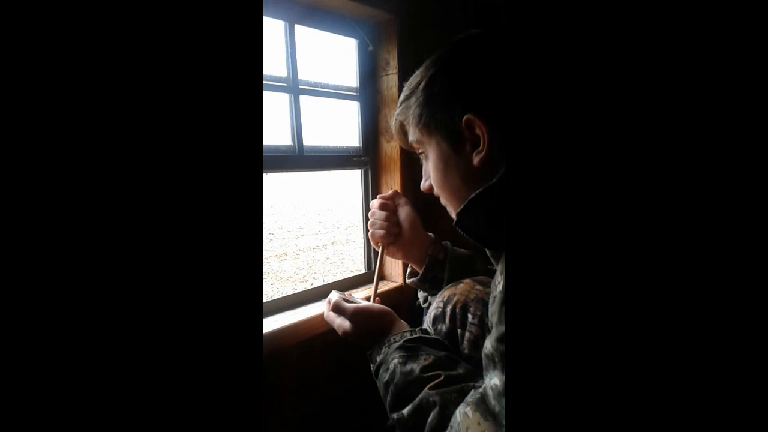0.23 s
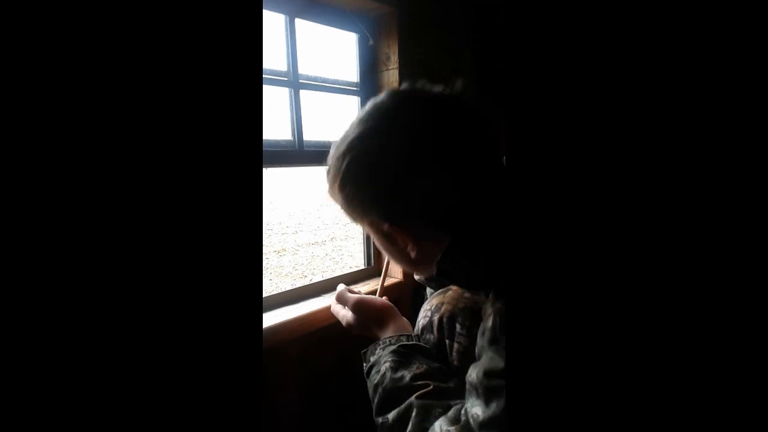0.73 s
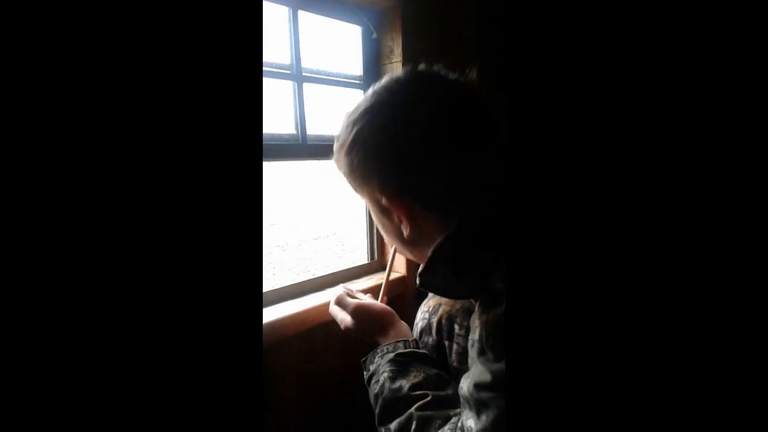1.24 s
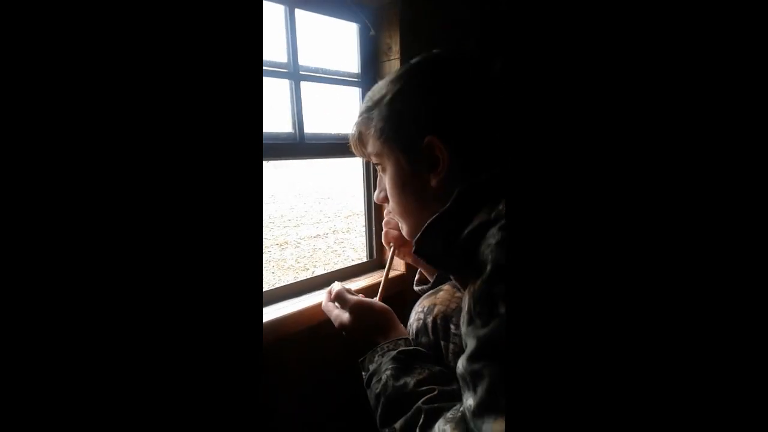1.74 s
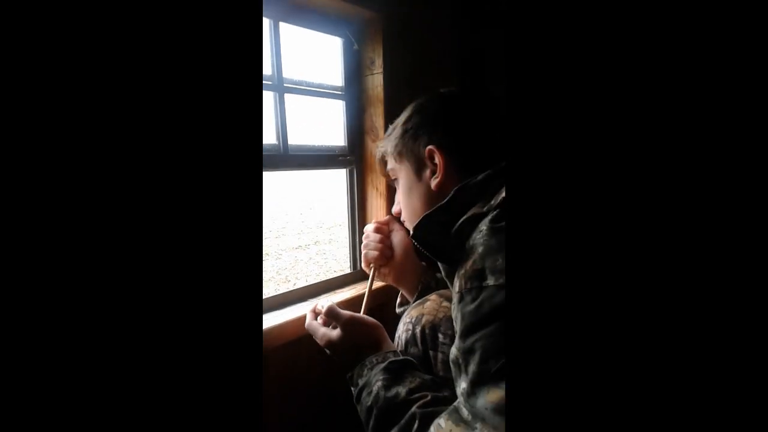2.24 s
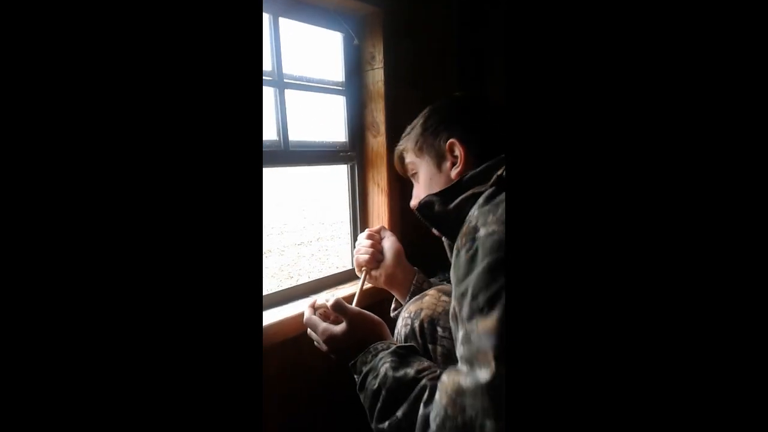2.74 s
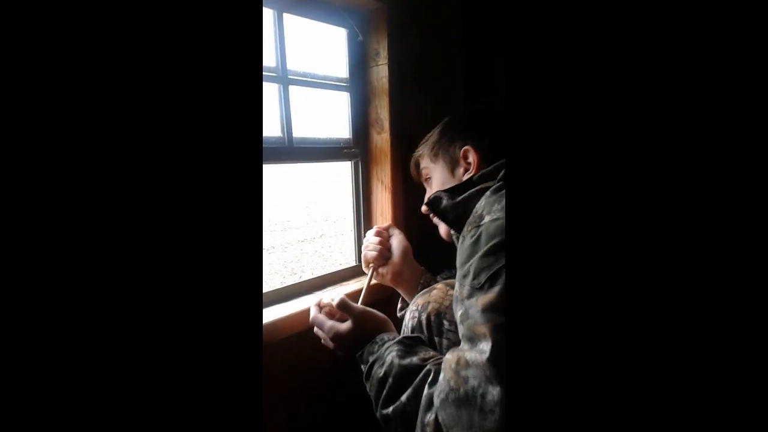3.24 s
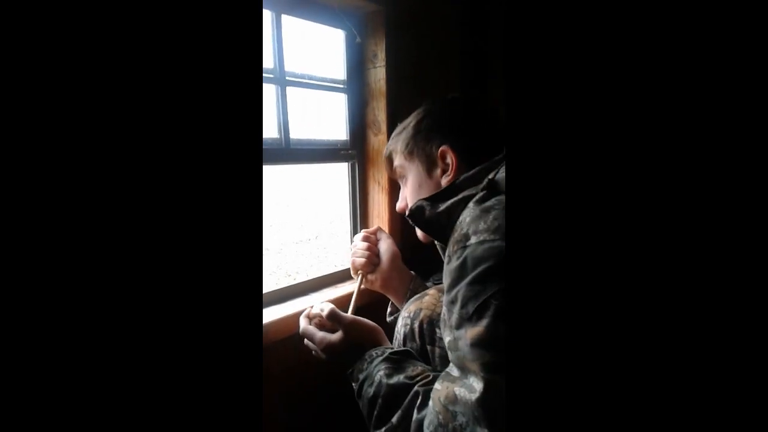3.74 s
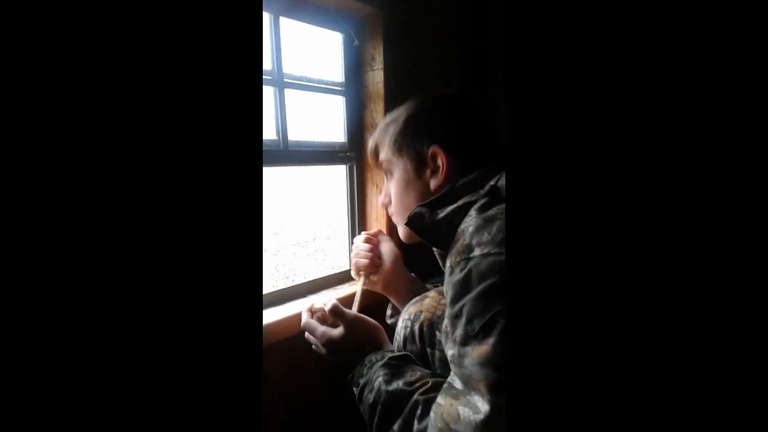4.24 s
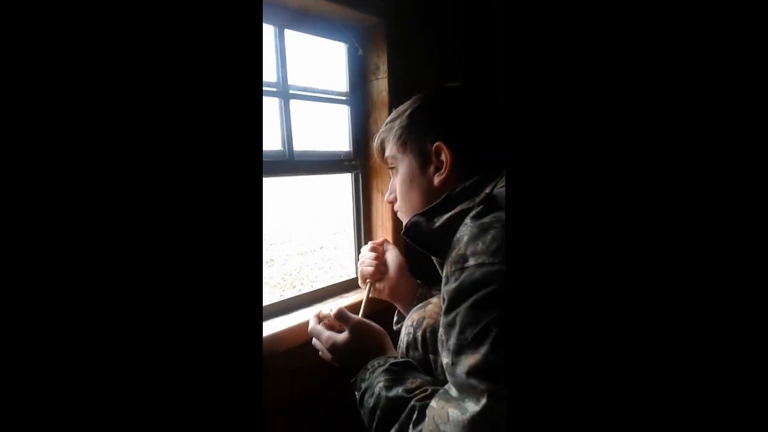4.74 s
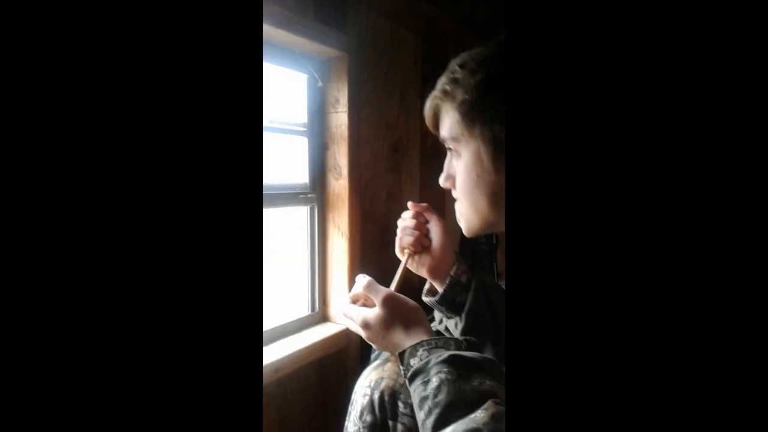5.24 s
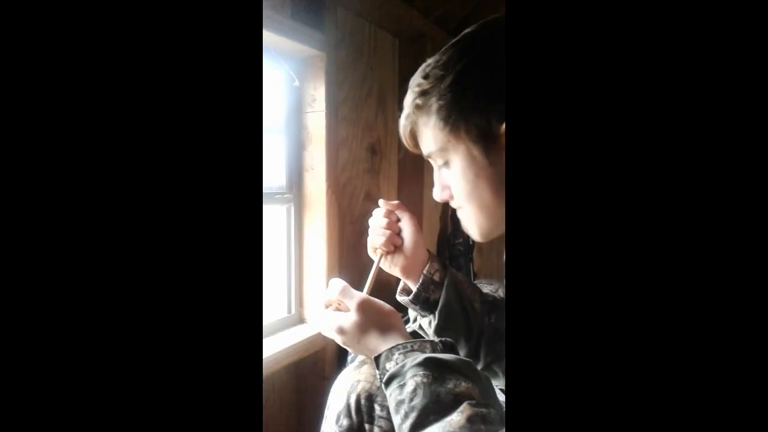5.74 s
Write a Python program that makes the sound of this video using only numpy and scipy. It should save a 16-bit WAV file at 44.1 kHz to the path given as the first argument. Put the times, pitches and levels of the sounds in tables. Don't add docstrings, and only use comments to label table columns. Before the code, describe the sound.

Close in a small wooden hunting blind, a wooden peg is scratched on a handheld friction pot call. Yelps start at once, a quick double bite at 0 s, then one every 0.2-0.3 s until the end near 5.8 s. Each lasts under a tenth of a second: a raspy, nasal, hen-turkey-like squawk with a buzzing pitch of a few hundred hertz, bending up or down, some clear, some split and gritty. The bare walls answer briefly. From 0.6 s the peg drags back lightly, most audibly around 0.7, 1.7 and 3.5 s. Sleeves brush at the start and near 2 and 2.8 s; muffled body shuffling swells around 0.9 s. A small tick comes at 1.46 s, the strongest yelps near 2.8 s, and a hard dull knock at 5.06 s, followed by two main yelps at 5.4 and 5.7 s. Faint hiss; phone microphone, left channel only, right silent.

```python
import sys
import numpy as np
from scipy import signal
from scipy.fft import rfft, irfft, next_fast_len
from scipy.io import wavfile
from scipy.ndimage import uniform_filter1d, minimum_filter1d, map_coordinates

SR = 44100
rng = np.random.default_rng(int(sys.argv[2]) if len(sys.argv) > 2 else 0)


def makeup_ratio(level_db):
    decades = np.asarray(level_db, float) / 20
    return 10 ** decades


def inscribe(sig):
    pcm = np.round(np.clip(np.atleast_2d(sig).T, -1, 1) * 32767)
    wavfile.write(sys.argv[1], SR, pcm.astype(np.int16))


N = 263717
SPAN = SR // 4
TAIL = SR // 2
LEAD = 512


def unit(x):
    return x / np.sqrt(np.mean(x ** 2) + 1e-20)


def along(points, hz):
    f, v = np.transpose(points)
    return np.interp(np.log(hz + 1), np.log(f + 1), v)


def filtered(x, response):
    m = next_fast_len(x.shape[-1] + 4096)
    spectrum = rfft(x, m) * response(np.fft.rfftfreq(m, 1 / SR))
    return irfft(spectrum, m)[..., :x.shape[-1]]


def wobble(rate_hz, n=N):
    knots = rng.standard_normal(n // 100)
    return map_coordinates(knots, [np.arange(n) * rate_hz / SR])


def swells(rows, floor_db):
    t = np.arange(N) / SR
    gain = makeup_ratio(floor_db)
    for middle_s, length_s, db in rows:
        phase = np.clip((t - middle_s) / length_s, -.5, .5)
        gain = gain + makeup_ratio(db) * np.cos(np.pi * phase) ** 2
    return gain


def noise(spectrum):
    return unit(filtered(rng.standard_normal(N), lambda f: makeup_ratio(along(spectrum, f))))


def rings(modes, f):
    total = 0
    for k, (center, width, db) in enumerate(modes):
        loss = 1j * f * width
        total = total + (-1) ** k * makeup_ratio(db) * loss / (center * center - f * f + loss)
    return total


def hiss():
    # f/Hz, level/dB per Hz
    air = [(150, -45.5), (250, -28), (400, -12), (1280, -17.5), (6180, -39.5), (11700, -48), (12350, -37),
           (12700, -81.5)]
    level_db = -66 + 6.5
    return makeup_ratio(level_db + .8 * wobble(5)) * noise(air)


def body_shuffle():
    # middle/s, length/s, level/dB
    moves = [(.35, 0.62, -63), (.7, 0.46, -58), (.93, 0.28, -50.5), (2.2, 0.39, -68), (2.9, 0.71, -71),
             (4.48, 0.28, -65), (5.17, .2, -58.5), (5.35, .15, -66.5), (3.75, 0.11, -64), (1.6, .25, -69),
             (5.66, 0.89, -65.5)]
    # f/Hz, level/dB per Hz
    rumble = [(15, -14), (40, -12.5), (58, -8), (80, 7), (110, -2), (160, 0), (300, -3.5), (420, -17),
              (700, -120)]
    still_db = -67.5
    return swells(moves, still_db) * makeup_ratio(2.5 + wobble(12)) * noise(rumble)


def sleeve_rustle():
    # middle/s, length/s, level/dB
    brushes = [
        (.08, 0.42, -52),
        (.75, 1, -62),
        (1.72, 0.23, -57.5),
        (1.98, 0.28, -54),
        (2.77, .2, -55),
        (3.58, 0.18, -60.5),
        (4.3, .8, -75),
    ]
    cloth = [(2500, -27.5), (4500, -2), (6500, -7.5), (8000, -22.5), (10000, -52.0)]  # f/Hz, level/dB
    hush_db = -73
    return swells(brushes, hush_db) * makeup_ratio(1.0 + 1.9 * wobble(60)) * noise(cloth)


def blind(x):
    # f/Hz, t60/s
    walls = [(300, 0.3), (1200, 0.27), (3000, 0.28), (6000, 0.26), (11000, 0.2)]
    hz, t, z = signal.stft(rng.standard_normal(SR // 2), SR, nperseg=256)
    decay = makeup_ratio(-60 * t / along(walls, hz)[:, None])
    tail = signal.istft(z * decay, SR, nperseg=256)[1]
    late = np.pad(x, (180, 0))
    return signal.fftconvolve(late, tail / np.linalg.norm(tail))[:len(x)]


def bumps():
    # t/s, peak level/dB, f/Hz, t60/s
    knocks = [(1.461, -37.5, 3540, .009), (1.461, -46, 5000, 0.0054), (1.462, -36, 900, .012),
              (5.026, -28, 610, 0.016), (5.063, -13, 524, 0.0084), (5.067, -21.5, 88.5, 0.05),
              (5.107, -45, 9000, 0.0024), (5.6, -51, 73.5, 0.15), (2.12, -54, 55, 0.17),
              (.92, -63, 70, .12), (1.09, -39.5, 263, 0.18)]
    out, t = np.zeros(N + SR), np.arange(SR // 4) / SR
    for start_s, db, hz, t60_s in knocks:
        knock = makeup_ratio(db - 60 * t / t60_s) * np.sin(2 * np.pi * hz * t)
        out[round(start_s * SR):][:len(t)] += knock
    return out[:N] + makeup_ratio(-32.5) * blind(out[:N])


def drag_back():
    # start/s, length/s, level/dB
    drags = [
        (0.616, 0.42, -46.5),
        (1.371, 0.18, -52.5),
        (1.625, 0.16, -45),
        (2.205, .06, -82),
        (3.49, 0.16, -46.5),
        (4.356, .08, -64),
        (5.336, 0.07, -53),
    ]
    # f/Hz, width/Hz, level/dB
    scrape = [(1260, 190, 2.5), (3640, 170, -3.5), (5870, 1100, -18)]
    rest_db = -78.5
    grit = rng.standard_normal(N) * makeup_ratio(wobble(110))
    push = swells([(s + length / 2, 1.3 * length, db) for s, length, db in drags], rest_db)
    return push * unit(filtered(grit, lambda f: rings(scrape, f) / (1 + (f / 7600) ** 8)))


def pot(f):
    # f/Hz, width/Hz, level/dB
    modes = [(1015, 363, 5), (1297, 415, -1.5), (1896, 97, -13.5), (2659, 144, 0.5), (3877, 240, 0),
             (4500, 280, -27), (6500, 1320, -10), (7840, 93, -36.5), (9800, 180, -16.5), (12100, 220, -11)]
    # f/Hz, level/dB
    shell = [(150, -41.5), (330, -20), (480, -10), (640, -16), (800, -4.5), (1500, 4.5), (3100, -3.5),
             (5000, 2), (8000, -17.5), (12000, -35), (15000, -50.5)]
    return (rings(modes, f) + makeup_ratio(-15.5)) * makeup_ratio(along(shell, f))


def spread(f):
    return np.exp(-2j * np.pi * (0.001796 * f + 1.7 * np.sin(f / 900) + 0.88 * np.sin(f / 370)))


def slips(hz, rough):
    timing, sizing, grit = rng.standard_normal((3, SPAN))
    turns = np.cumsum(hz * (1 + 0.1137 * rough * wobble(130, SPAN))) / SR
    at = np.interp(np.arange(1, turns[-1]), turns, np.arange(SPAN))
    here = at.astype(int)
    at = at + 0.084 * rough[here] * timing[:len(at)] * SR / hz[here]
    at = np.clip(at, 0, SPAN - 1)
    size = makeup_ratio(5.5 * rough[here] * sizing[:len(at)])
    taps = at.astype(int)[:, None] + np.arange(-7, 9)
    offset = taps - at[:, None]
    kernel = np.sinc(offset) * np.cos(np.pi * offset / 17) ** 2
    train = np.bincount((taps + 8).ravel(), (size[:, None] * kernel).ravel(), SPAN + 24)[8:SPAN + 8]
    share = np.clip(.95 * rough, 0, 1) ** 2
    return np.sqrt(1 - share) * train * np.sqrt(SR / hz) + np.sqrt(share) * grit


def bite(stroke, rough, glide, grip):
    # t/s, loss/dB
    skips = [(0.032, 3.5), (.295, 10.5), (1.045, 3), (1.069, 12), (1.805, 8.5), (2.066, 11.5), (2.091, 6),
             (2.299, 4.5), (2.582, 13), (2.8, 7), (2.839, 9), (2.863, 3.5), (3.391, 8), (3.408, 4),
             (3.671, 6.5), (3.983, 6.5), (4.255, 4.5), (4.703, 5), (5.481, 2.5)]
    skip_s, swell_db, roughen = 0.0052, 6.5, 1.8
    middle_rise_db, arch_db, brightest = 2.5, 11, 0.43
    start_s, length_s, db = stroke
    first_hz, turn, turn_hz, last_hz = glide
    push, ease_db, middle_db, bright_db = grip
    u = np.linspace(0, 1, 41)
    t = start_s + u * length_s
    turn, push = np.clip([turn, push], .03, .97)
    hz = np.interp(u, [0, turn, 1], [first_hz, turn_hz, last_hz])
    body_db = db + np.interp(u, [0, push, 1], [-swell_db * push, 0, -ease_db])
    for at_s, loss_db in skips:
        body_db = body_db - loss_db * np.exp(-((t - at_s) / skip_s) ** 2)
    middle_db = middle_db + middle_rise_db * (2 * u - 1)
    bright_db = bright_db - arch_db * (2 * (u - brightest)) ** 2
    return np.transpose([t, hz, body_db, middle_db, bright_db, rough * (1 + roughen * u ** 2)])


def yelp(rows, edge_db, fill_db, cup_db):
    splits_hz = (1600, 3000, 7300)
    s, *cols = np.transpose(rows)
    t = s[0] + (np.arange(SPAN) - LEAD) / SR
    hz, body_db, middle_db, bright_db, rough = (np.interp(t, s, c) for c in cols)
    force = slips(hz, np.clip(rough, 0, 1))
    lift = makeup_ratio(-60 * np.clip(t - s[-1], 0, 1) / 0.011)

    def valley(f, center_hz, width_hz):
        return np.exp(-((f - center_hz) / width_hz) ** 2)

    def tilted(f):
        return pot(f) * makeup_ratio(fill_db * valley(f, 3423, 170) + cup_db * valley(f, 1420, 200))

    def under(f, k):
        return 1 / (1 + (f / splits_hz[k]) ** 12)

    low = lambda f: tilted(f) * under(f, 0)
    middle = lambda f: tilted(f) * (under(f, 1) - under(f, 0))
    high = lambda f: tilted(f) * (under(f, 2) - under(f, 1)) * spread(f)
    top = lambda f: pot(f) * (1 - under(f, 2)) * spread(f)

    flutter = (0.64 + 3.94 * rough) * wobble(90, SPAN)
    top_db = 1.57 * (body_db + bright_db) - 10.0 + edge_db + 4.0 * flutter
    middle_db = middle_db + 2.3 * wobble(60, SPAN)
    bright_db = bright_db + 2.3 * wobble(60, SPAN)
    body_db = body_db + 1.2 * flutter
    bands = [(low, body_db, .003), (middle, body_db + middle_db, .003),
             (high, body_db + bright_db, .004), (top, top_db, .012)]
    out = 0
    for part, db, onset_s in bands:
        touch = np.sin(np.pi / 2 * np.clip((t - s[0]) / onset_s, 0, 1)) ** 2 * lift
        steady, played = filtered(np.array([force, force * touch * makeup_ratio(db)]), part)
        out = out + played / np.std(steady[t < s[-1]])
    out = np.pad(out, (0, TAIL))
    return makeup_ratio(-3.5) * out + makeup_ratio(-5.5) * blind(out)


def yelps():
    # start/s, length/s, level/dB, top resonances/dB
    strokes = [(0.0, 0.038, -8, -2), (0.037, 0.065, -10.5, 1), (0.243, 0.082, -13, -2.3),
               (.505, 0.041, -12.5, -7.5), (.742, 0.015, -22.5, -5), (0.759, .088, -11.5, 1.3),
               (1.016, 0.031, -10, 4), (1.05, 0.045, -12, 6.5), (1.085, .032, -15, 3),
               (1.544, 0.056, -17.5, 4.5), (1.775, 0.082, -14.5, .1), (1.989, 0.027, -16, 3.5),
               (2.011, .1, -10, 4), (2.271, 0.08, -12, -4.7), (2.568, 0.051, -12, 0), (2.778, 0.057, -6, 5),
               (2.849, 0.038, -4.5, 1), (3.128, .034, -13.5, -3.5), (3.378, .038, -11.5, 1.7),
               (3.653, .05, -9, 5.5), (3.703, 0.047, -13, 3.5), (3.937, .063, -12.5, -0.8),
               (4.201, 0.038, -11.5, 3.5), (4.238, 0.02, -5.5, 0.8), (4.467, 0.039, -12.5, -3),
               (4.659, .055, -10, -1), (4.939, 0.025, -16, -5), (5.107, .022, -30, -2),
               (5.439, 0.055, -12.5, -3), (5.694, 0.049, -9, -13)]
    roughs = [.08, .2, .22, .06, .15, .13, .06, .2, .3, .2, .24, .3, .1, .18, .14, .08, .15, .07, .3, .05,
              .15, .06, .08, .17, .3, .14, .08, .08, .12, .06]
    # first f/Hz, turn [share of length], turn f/Hz, last f/Hz
    glides = [(549, .45, 510, 430), (480, 0.4, 560, 518), (311.6, .6, 322, 260), (506.3, .62, 488, 610),
              (465, .5, 430, 490), (397, .3, 318, 331), (586, .35, 606, 360), (321.6, 0.1, 300, 400),
              (485, 0.7, 440, 489), (330, .55, 280, 322), (366.3, .35, 260, 307), (517, 0.4, 510, 490),
              (345.9, .55, 360, 405), (320.6, .4, 302, 420), (444, 0.1, 424, 515), (587, 0.3, 505, 440),
              (484.4, .5, 610, 480), (504.5, .5, 539, 602), (301, 1, 360, 390), (641, .55, 558, 511),
              (433, 0, 426, 610), (515, .7, 515, 603), (365.6, .5, 400, 395), (365, 0.6, 385, 404),
              (310.7, .55, 370, 260), (444, .68, 588, 572), (524, .5, 514, 540), (518.6, 0.5, 720, 532),
              (350.6, .5, 345, 400), (639, 0.6, 632, 626)]
    # hardest push [share of length], easing by the end/dB, middle/dB, brightness/dB
    grips = [(1, -2.5, -4.5, -4), (0.07, 13.5, -2.5, -5), (0.43, 11.5, -8.5, -11.5), (0.5, 3.5, -5.5, -8),
             (0.35, 1.5, -17, -17), (0.3, 5.5, -9.5, -8.5), (.4, 0.5, -13, -14), (.15, 1, -20, -8.5),
             (.05, 15.5, 0, -9.5), (0.95, 0, -8.5, -12), (.05, 3, -5.5, -4), (0.2, 2, -8, -9.5),
             (0.57, 9.5, -6.5, -6), (0.18, 10, -1, -3.5), (.05, 1.5, -4, -6), (0.62, 7, -14.5, -8),
             (.05, 21, -5.5, -7.5), (0.5, 4, -1, -7.5), (.5, 5.5, -7, -11.5), (0.5, -2, -12, -13),
             (0, 5.5, -1.5, -4.5), (.05, -1, -0.5, -5), (0.45, 0, -7.5, -9.5), (0, 4, -7.5, -9),
             (0.4, 10, -6.5, -11.5), (0.22, 6.5, -2.5, -7), (0.1, 2.5, -1.5, -12.5), (1, -1, -10, -12.5),
             (0.38, 1.5, -12.5, -16), (.4, 10, -11, -13.5)]
    # 3 kHz valley fill/dB, 1.5 kHz valley fill/dB
    fills = [(4.5, 0.9), (10.5, 3.5), (10, 0.5), (13, 7), (1, -11), (2.5, 0.5), (2, 7.5), (4, .1), (7, -4),
             (2.5, 2.3), (5, -3.5), (3.5, -3.2), (3, -1.3), (4, -1.5), (0, 4.5), (4.5, -2.5), (2.2, 8.5),
             (-3.5, 3.5), (-1.5, 3), (3.5, 8.5), (5, 8), (0.5, 6), (0, 9.5), (13.5, 4.5), (2, 4), (5.5, 2),
             (-6, 10.5), (15, -5), (13, -2), (13, 4.5)]
    edge_all_db = -0.6
    out = np.zeros(N + SPAN + TAIL + LEAD)
    for (*stroke, edge_db), rough, glide, grip, fill in zip(strokes, roughs, glides, grips, fills):
        controls = bite(stroke, rough, glide, grip)
        start = round(stroke[0] * SR)
        out[start:][:SPAN + TAIL] += yelp(controls, edge_all_db + edge_db, *fill)
    return out[LEAD:N + LEAD]


def scene():
    background = hiss() + body_shuffle() + sleeve_rustle()
    left = background + bumps() + drag_back() + yelps()
    return np.array([left, np.zeros(N)])


def roll_off(x):
    return signal.sosfilt(signal.butter(12, 13310, fs=SR, output="sos"), x)


def record(dry):
    left = filtered(dry[0], lambda f: (1j * f / (55 + 1j * f)) ** 2 / (1 + (f / 12900) ** 60))
    need = minimum_filter1d(np.minimum(1, .88 / (np.abs(left) + 1e-9)), size=401)
    mix = left * uniform_filter1d(need, size=201) * [[1], [0]]
    return roll_off(mix)


dry = scene()
out = record(dry)
inscribe(out)
```